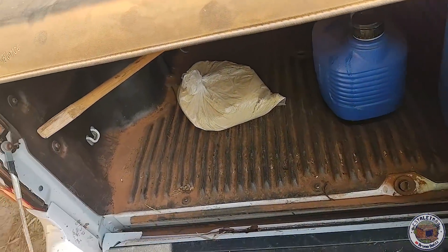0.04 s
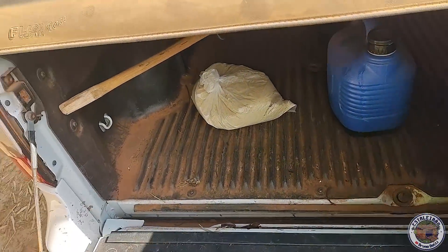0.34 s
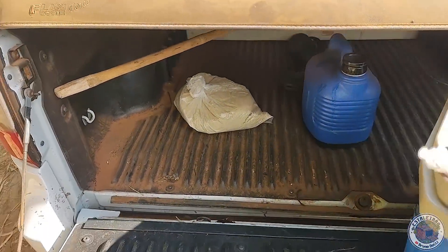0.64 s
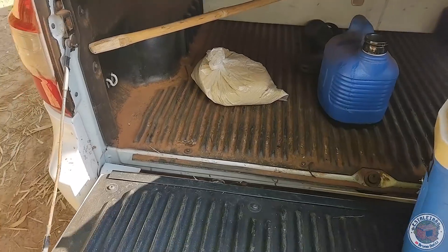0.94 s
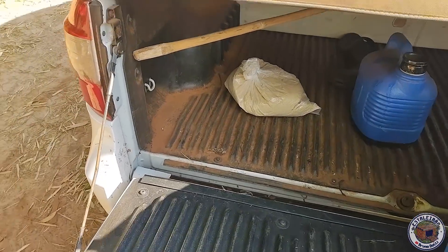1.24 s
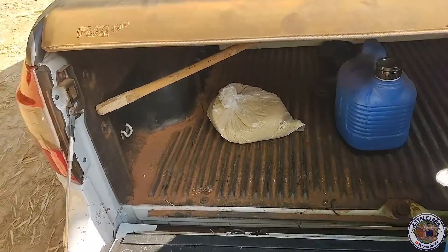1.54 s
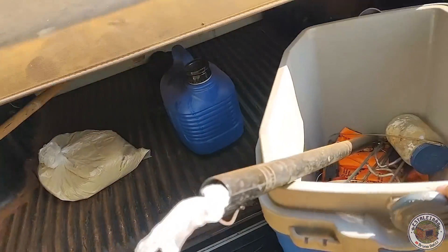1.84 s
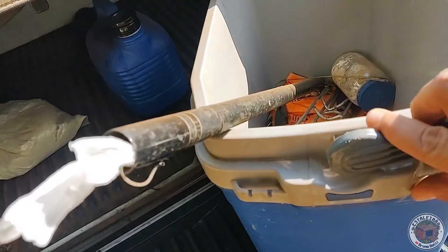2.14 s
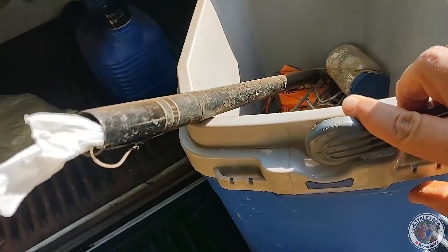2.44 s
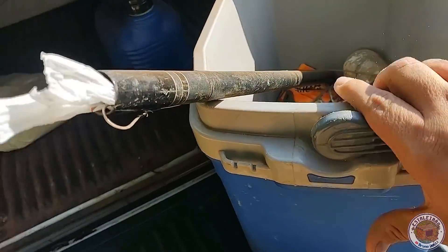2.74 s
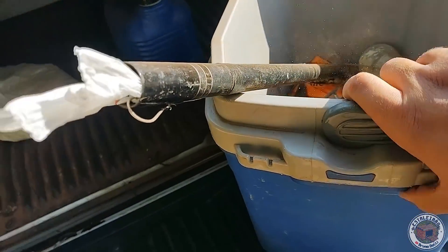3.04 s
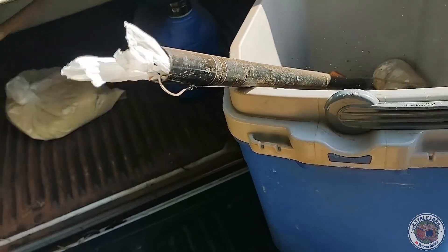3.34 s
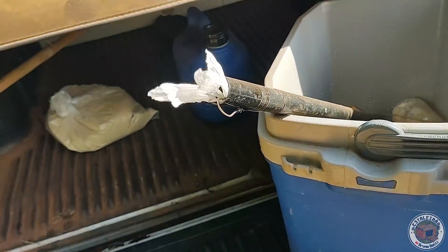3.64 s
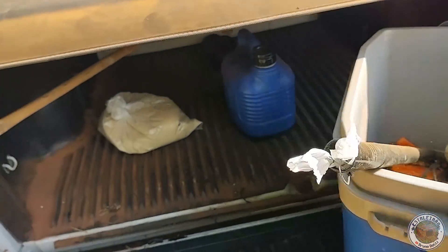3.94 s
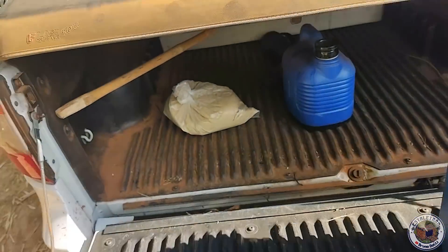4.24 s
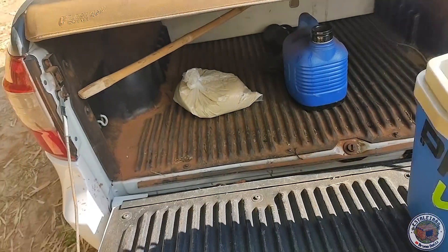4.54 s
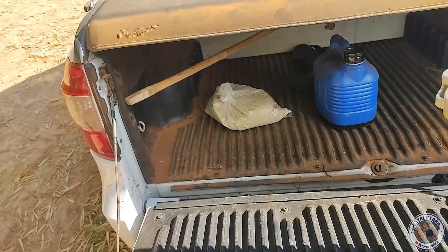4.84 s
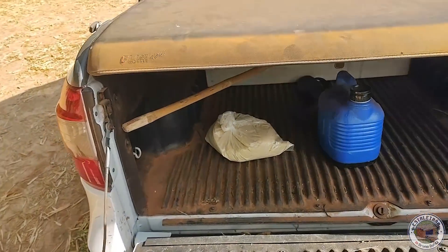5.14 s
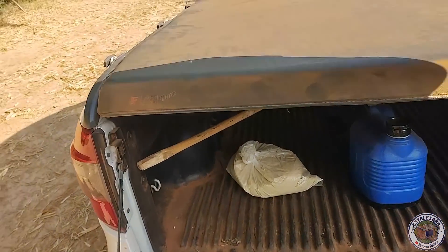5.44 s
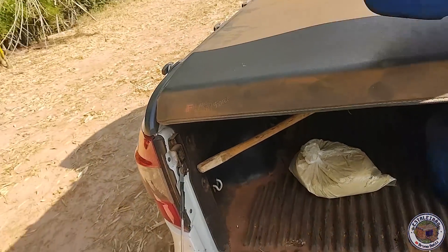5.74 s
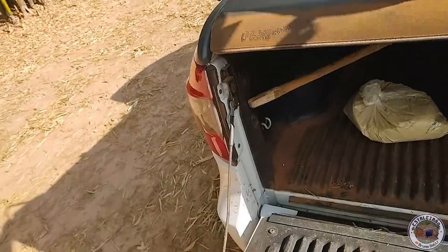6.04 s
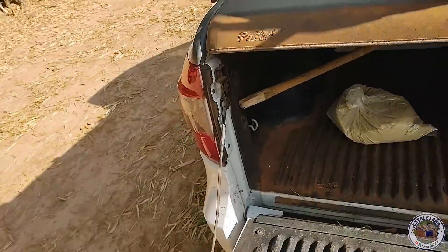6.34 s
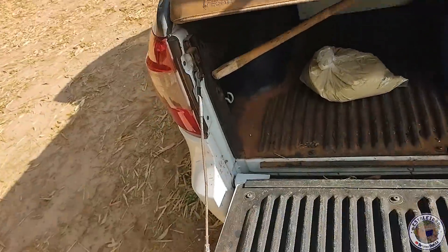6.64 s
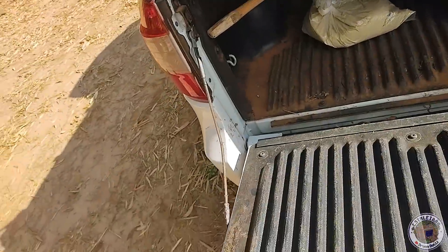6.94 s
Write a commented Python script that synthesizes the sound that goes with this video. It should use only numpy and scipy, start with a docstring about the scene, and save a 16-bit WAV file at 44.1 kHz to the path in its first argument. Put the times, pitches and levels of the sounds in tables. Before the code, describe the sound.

Hollow plastic knocks and gritty, drumming scrapes as a cooler is shoved around a truck bed, over faint outdoor rumble.

```python
"""A loaded plastic cooler is shoved about on the ribbed liner of a pickup bed, outdoors.
Stick-slip makes it drum over the ribs and rasp through its walls, while dust crackles under it.
It rocks and knocks, its handle slaps down, its base bumps dully; each blow rings walls, box and floor.
The bed echoes. A soft background hiss swells with gritty scraping as the cooler slides.
Behind it lie a low outdoor rumble and a thin insect buzz; a second faint rumble joins at the end."""
import sys
import numpy as np
from scipy import signal
from scipy.fft import rfft, irfft, next_fast_len
from scipy.io import wavfile
from scipy.ndimage import map_coordinates

SR = 44100
rng = np.random.default_rng(int(sys.argv[2]) if len(sys.argv) > 2 else 0)


def unload_audio(sound):
    """Save the sound as a 16-bit wav file, at the path given as the first command line argument."""
    columns = np.transpose(np.atleast_2d(sound))
    # keep every value between -1 and 1, then stretch to whole-number steps
    steps = np.round(np.clip(columns, -1, 1) * 32767)
    wavfile.write(sys.argv[1], SR, steps.astype(np.int16))


N = 316638

# Event levels are relative; the functions add per-layer trims.
# hard knocks: t/s, level/dB, boom re level/dB, snap re level/dB, struck spot f/Hz
HARD_KNOCKS = [(0.003, -43, 7, -22, 1060), (0.1115, -32, -6.5, -16.5, 1800), (0.287, -39.5, 7.5, -29, 800),
               (0.39, -32, -6.5, -36, 955), (0.521, -30, -6.5, -29.5, 535), (0.561, -26, 0, -30, 1260),
               (0.5665, -22.5, 3, -38, 1100), (0.657, -22, -9, -40, 1230), (0.705, -35, 7, -14.5, 600),
               (0.958, -19, -1, -17.5, 810), (0.981, -27.5, 2, -23, 920), (1.001, -24.5, -3.5, -24.5, 840),
               (1.0465, -32.5, -12, -33, 1100), (1.161, -32.5, 2, -19.5, 920),
               (1.348, -34.5, -10, -30, 754), (1.496, -34.5, 10.5, -13.5, 840),
               (1.5756, -37.5, -3.5, -15.5, 2020), (1.781, -40.5, 2, -18.5, 1010),
               (1.877, -38.5, 1, -15.5, 1060), (1.923, -41, -3, -34, 700), (2.064, -61, -8, -25, 790),
               (2.8972, -15.6, -8, -15.5, 1450), (3.176, -52.5, -1, -14, 1194), (3.362, -53, -4, -28, 765),
               (3.385, -51, 3, -26, 900), (3.644, -48.5, 0, -26, 1330), (4.05, -29, 2, -26, 955),
               (4.097, -30.5, -1, -25, 810), (4.315, -34.5, 4.5, -36, 537), (4.384, -36.5, 0.5, -26, 1050),
               (4.53, -25, -2, -25, 710), (5.848, -44, -2, 0.5, 796), (6.131, -47, 4, -15.5, 638),
               (6.96, -60.5, 9, 6.5, 948)]
# dull bumps of the base: t/s, level/dB, floor thud re level/dB
BASE_BUMPS = [(0.191, -33, 1), (0.39, -34.5, 8.5), (0.44, -33.5, -18), (0.946, -29, -15),
              (1.603, -32.5, -22), (1.64, -41, 3.5), (2.653, -53, -10), (2.822, -36, -9.5),
              (3.31, -43.5, -16.5), (3.878, -34, -15), (4.367, -25, -8), (4.386, -31, 6), (4.449, -31, -17),
              (4.496, -32, -13), (5.829, -29, -2.5), (5.962, -38, -4), (6.029, -43.5, -5),
              (6.285, -34.5, -25), (6.309, -38.5, -7), (6.835, -57, 11)]
# shoves, then a faint low rumble at the end (6.45-7.18 s):
# start/s, end/s, midpoint drum/dB, rasp/dB, grit/dB, rasp swell/(dB/s)
SHOVES_AND_RUMBLE = [(0, 0.195, -39.5, -47.5, -65, -31), (0.206, 0.55, -33.5, -38, -60, 53),
                     (0.551, 0.724, -31, -34.5, -50, 6), (0.8, 1.34, -54.5, -58, -68, -8),
                     (1.47, 1.95, -52, -66.5, -76.5, -17), (2.702, 2.8, -61.5, -64, -71, 30.5),
                     (2.807, 2.985, -42, -50, -59.5, -0.5), (2.995, 3.176, -59.5, -62, -64.5, -17),
                     (3.33, 3.476, -50, -56, -73, 13), (3.552, 3.75, -56, -63, -71.5, -21.5),
                     (3.887, 4.0, -44.5, -48, -71, 25), (4.012, 4.285, -35, -33, -52.5, -5),
                     (4.345, 4.532, -36.5, -42.5, -60.5, -17), (4.593, 4.676, -47.5, -50.5, -54.5, -25),
                     (4.83, 4.938, -69, -59.5, -68, -24), (5.848, 6.022, -36, -52.5, -59.5, -43),
                     (6.08, 6.42, -53, -72, -73, -12.5), (6.302, 6.352, -41, -58, -77, 0),
                     (6.45, 7.18, -61.5, -75, -70.5, -1.5), (6.947, 7.014, -50.5, -61, -64.5, -46)]
LOOSE_TICKS = [(1.475, -50.5), (1.621, -56.5), (2.257, -68), (4.449, -46), (6.068, -60), (6.305, -56)]  # loose plastic: t/s, level/dB
RIGHT_LEAD = [(.1, .33), (1.55, .34), (1.88, 0.17), (2.9, .07), (4.1, 0.24), (4.53, .32)]  # cooler direction: t/s, lead at right microphone/ms
WALL_MODES = [(363, 130, -6.5), (430, 55, -3), (476, 37, 2.5), (658.2, 21, 2), (735, 83, -2.5),
              (916, 50, -4), (1050, 56, -6), (1210, 100, -5.5), (1454, 92, -7.5), (1660, 66, -6.5),
              (1825, 100, -8), (2206, 90, -13), (2285, 36, -19), (2709, 130, -18.5)]  # cooler walls: f/Hz, bandwidth/Hz, level/dB
BOX_MODES = [(189.4, -7, 0.16), (211.6, -3.5, 0.18), (242, -4.5, 0.12), (295.5, -11.5, 0.15),
             (369.6, -10, 0.065)]  # hollow box: f/Hz, level/dB, t60/s
FLOOR_MODES = [(52, -19.5, 0.16), (79, -8, 0.42), (110, 1.5, 0.17), (131.5, 8, 0.1712)]  # bed floor: f/Hz, level/dB, t60/s
BED_DECAY = [(100, 0.43), (300, 0.28), (1000, 0.29), (4000, 0.46), (12000, .15)]  # bed ring: f/Hz, t60/s
COHERENCE = [(100, 0.55), (300, 0.83), (700, 1), (1500, 0.021), (4000, 0.015)]  # scattered sound: f/Hz, left-right coherence
INSECT_CALLS = [(1.857, 2.157, -73.5), (3.472, 3.97, -69), (4.92, 5.25, -82), (7.009, 7.193, -74)]  # buzzes: start/s, end/s, level/dB
# soft background hiss, swelling with gritty scraping as the cooler slides: t/s, level/dB
HISS_ENVELOPE = [(0.0, -71), (0.4, -74), (0.62, -57), (0.76, -63.5), (2.14, -72.5), (2.32, -74.5),
                 (2.76, -80), (2.96, -65.5), (3.24, -73), (4.0, -73), (4.2, -63), (5.38, -70),
                 (5.88, -63.5), (7.18, -73.5)]
# source spectra: f/Hz, relative density/dB
CRACK_SPECTRUM = [(200, -17.5), (500, 2), (900, 6), (1450, 3), (2100, -1), (2900, -16.5), (3800, -26),
                  (8000, -43.5), (16000, -76)]
CONTENTS_SPECTRUM = [(150, -35.5), (300, -7), (450, 4.5), (800, 3), (1300, -3), (2200, -12), (3000, -22),
                     (4000, -39), (16000, -77)]
SNAP_SPECTRUM = [(1200, -23.5), (2600, -0.5), (4000, 2.5), (5300, 3), (8000, -6), (11000, -18.5),
                 (15500, -27.5)]
DRUM_SPECTRUM = [(25, -41), (50, -17.5), (85, -4), (125, 4), (158, -3.5), (190, -3), (270, -5.5),
                 (440, -12), (800, -32), (3000, -50), (16000, -81)]
RASP_SPECTRUM = [(150, -19), (330, -10.5), (460, 2.5), (850, -5.5), (1300, -1.5), (2000, -5), (2800, -12),
                 (3400, -29), (6000, -39), (16000, -69.5)]
GRIT_SPECTRUM = [(1500, -10), (3300, 0.5), (5500, -0.5), (8000, -7), (11000, -12.5), (15500, -21)]
TICK_SPECTRUM = [(300, -8), (900, 8), (2500, -5.5), (5500, -4), (9000, -13), (15500, -30.5)]
BUZZ_SPECTRUM = [(6000, -33), (8500, -9.5), (10000, -9), (10800, -3.5), (11500, -10), (12500, -21),
                 (15000, -55)]
RUMBLE_SPECTRUM = [(25, -32.5), (65, -8), (130, -2.5), (250, 2), (340, -1), (500, -10), (1000, -18.5),
                   (3000, -26.5), (8000, -62.5)]
HISS_SPECTRUM = [(400, -6.5), (1200, 1.5), (2300, -0.5), (3400, -4.5), (5300, 1.5), (8000, -3.5),
                 (11000, -9), (15500, -11.5)]


def cooler_knocks(contact_rise_s=0.00023, body_rise_s=0.0038, spot_cycles=10, usual_snap_db=-21):
    """Each blow clacks at the contact, chatters through the walls, booms in the box, thuds on the floor."""
    t = np.arange(SR // 2) / SR
    fall = lambda t60_s: amp(-60 * t / t60_s)
    rise = lambda tau_s: 1 - np.exp(-t / tau_s)
    touch = burst(1. * (t == 0))
    hardest_db = max(row[1] for row in HARD_KNOCKS)
    track = np.zeros(N)
    for t_s, clack_db, chatter_db, boom_db, thud_db, snap_db, spot_hz in blows():
        noise = rng.standard_normal((5, len(t)))
        # gentler, blunter blows stay in contact longer: slower attack
        edge_db = snap_db - clack_db - usual_snap_db
        press = rise(contact_rise_s * amp(0.2 * (hardest_db - clack_db) - 0.4 * edge_db)) ** 2
        grind = burst(noise[0] * fall(0.012) * press)
        crack = coloured(touch + 1.1 * grind, CRACK_SPECTRUM)
        spot = np.sin(2 * np.pi * spot_hz * t) * fall(spot_cycles / spot_hz) * press
        clack = amp(-2.7) * burst(crack) + amp(-5) * burst(spot)
        # loose contents drive the walls and the struck spot
        contents = coloured(noise[1] * fall(0.13) * rise(0.0079), CONTENTS_SPECTRUM)
        ring = walls(noise[2] * fall(0.081))
        rattle = signal.fftconvolve(noise[3] * fall(0.07), spot)[:len(t)]
        chatter = amp(-3) * burst(contents) + amp(-3) * burst(ring) + amp(-9) * burst(rattle)
        boom = burst(ringing(BOX_MODES, t, detune=0.023) * rise(body_rise_s) ** 2)
        thud = burst(ringing(FLOOR_MODES, t, detune=0.071) * rise(body_rise_s))
        # grit snaps, then is crushed
        crush = burst(noise[4] * (fall(0.0047) + amp(-18) * fall(0.1)) * press)
        snap = burst(coloured(amp(-2) * touch + crush, SNAP_SPECTRUM))
        add(track, t_s, amp(clack_db) * clack + amp(chatter_db) * chatter + amp(snap_db - 1) * snap)
        add(track, t_s, amp(boom_db - 1) * boom + amp(thud_db - 2) * thud)
    return track


def blows(base_hz=700):
    """Knocks and blunter bumps: t/s, clack/dB, chatter/dB, boom/dB, thud/dB, snap/dB, f/Hz."""
    hard = [(t_s, db, db + boom_db / 2 - 5, db + boom_db, db + boom_db - 11.5, db + snap_db, hz)
            for t_s, db, boom_db, snap_db, hz in HARD_KNOCKS]
    dull = [(t_s, db - 14, db - 10.5, db, db + thud_db, db - 32, base_hz * 2 ** rng.normal(0, 0.37))
            for t_s, db, thud_db in BASE_BUMPS]
    return hard + dull


def ringing(modes, t, detune):
    """Damped modes; level and pitch vary from blow to blow."""
    scatter = rng.standard_normal((len(modes), 2))
    return sum(amp(db + 1.9 * a - 60 * t / t60_s) * np.sin(2 * np.pi * hz * (1 + detune * b) * t)
               for (hz, db, t60_s), (a, b) in zip(modes, scatter))


def walls(x):
    """Wall resonances in parallel, alternating in sign."""
    return filtered(x, lambda f: sum(
        (-1) ** k * amp(db) * 1j * f * width_hz / (hz * hz - f * f + 1j * f * width_hz)
        for k, (hz, width_hz, db) in enumerate(WALL_MODES)))


def slides_and_rumble():
    """The base drums over the ribs and rasps through the walls; dust crackles. A faint rumble ends it."""
    drum_gain, rasp_gain, grit_gain = drum_rasp_grit_gains()
    judder = wobble(45)
    drum = unit(coloured(slips(rate_hz=410, scatter_db=5.5), DRUM_SPECTRUM))
    rub = unit(coloured(slips(rate_hz=2600, scatter_db=7) * amp(2 * judder), RASP_SPECTRUM))
    ring = unit(walls(slips(rate_hz=1200, scatter_db=10)))
    rasp = unit(rub + amp(-1) * ring)
    grains = [slips(rate_hz=4300, scatter_db=4) * amp(2.5 * judder) for channel in "LR"]
    grit = unit(np.array([coloured(side, GRIT_SPECTRUM) for side in grains]))
    return amp(-2) * (drum_gain * drum + rasp_gain * rasp), amp(-1) * grit_gain * grit


def slips(rate_hz, scatter_db):
    """Stick-slip jolts, random in time and size."""
    size = amp(scatter_db * np.clip(rng.standard_normal(N), -2, 2))
    sign = np.sign(rng.standard_normal(N))
    return unit(size * sign * (rng.random(N) < rate_hz / SR))


def drum_rasp_grit_gains(attack_db_per_s=600.5, stop_db_per_s=221.5, grit_db_per_s=251.5):
    """Each span sets in, swells or eases, dies away; overlaps add in power."""
    power = np.zeros((3, N))
    for start_s, end_s, drum_db, rasp_db, grit_db, swell_db_per_s in SHOVES_AND_RUMBLE:
        near = np.arange(max(int((start_s - .5) * SR), 0), min(int((end_s + .5) * SR), N))
        t = near / SR
        before_s, after_s = np.maximum(start_s - t, 0), np.maximum(t - end_s, 0)
        swell_db = swell_db_per_s * (np.clip(t, start_s, end_s) - (start_s + end_s) / 2)
        fade_db = attack_db_per_s * before_s + stop_db_per_s * after_s
        power[:, near] += amp([drum_db + 0.35 * swell_db - fade_db,
                               rasp_db + swell_db - fade_db,
                               grit_db + 0.93 * swell_db - grit_db_per_s * (before_s + after_s)]) ** 2
    return np.sqrt(power)


def ticks(t60_s=0.0099):
    """Small loose parts touch without moving the box."""
    t = np.arange(SR // 8) / SR
    track = np.zeros(N)
    for t_s, db in LOOSE_TICKS:
        contact = rng.standard_normal(len(t)) * amp(-60 * t / t60_s)
        add(track, t_s, amp(db) * burst(coloured(contact, TICK_SPECTRUM)))
    return track


def direct_path(x, pan_db=0.78):
    """Sound reaches the right microphone earlier and louder."""
    lead_ms = curve(RIGHT_LEAD)
    shift_samples = lead_ms / 2 * SR / 1000
    left = map_coordinates(x, [np.arange(N) - shift_samples])
    right = map_coordinates(x, [np.arange(N) + shift_samples])
    return np.array([amp(-pan_db) * left, amp(pan_db) * right])


def truck_bed(x, block_samples=6144):
    """Cooler and microphone keep moving: each block meets a new echo pattern."""
    wet = np.zeros((2, N))
    for start in range(0, N, block_samples):
        echoes = signal.fftconvolve(x[None, start:start + block_samples], bed_echo(), axes=1)
        for track, echo in zip(wet, echoes):
            add(track, start / SR, echo)
    return wet


def bed_echo(early_t60_s=0.043):
    """Close echoes off liner and cover, then a weak ring of the bed."""
    hz, frame_s, spectra = signal.stft(rng.standard_normal((2, SR // 3)), SR, nperseg=256)
    decay = amp(-60 * frame_s / along(BED_DECAY, hz)[:, None])
    tail = signal.istft(spectra * decay, SR, nperseg=256)[1]
    t = np.arange(tail.shape[1]) / SR
    early = rng.standard_normal(tail.shape) * amp(-60 * t / early_t60_s) * (t > .0015)
    # long waves bend round the ribs; short ones scatter
    scattering = lambda f: amp(along([(200, -13), (1000, 2), (6000, 3.5)], f))
    early = filtered(early / np.linalg.norm(early[0]), scattering)
    return spread(amp(-6) * early + amp(-21) * tail / np.linalg.norm(tail[0]))


def outdoor_rumble(lull_s=5.555, lull_db=-12.6):
    """A wavering low rumble with one lull."""
    level_db = -61.5 + lull_db * gate(lull_s, lull_s, fade_s=0.505) + 2.8 * wobble(6.8)
    return amp(level_db) * wash(RUMBLE_SPECTRUM)


def hiss_and_scraping():
    """Soft background hiss, swelling with gritty scraping as the cooler slides."""
    level_db = curve(HISS_ENVELOPE) + 2 + 0.7 * wobble(6.5)
    return amp(level_db) * wash(HISS_SPECTRUM)


def insect():
    """A thin, high, fluttering buzz from the dry grass."""
    gain = sum(amp(db) * gate(start_s, end_s, fade_s=0.11) for start_s, end_s, db in INSECT_CALLS)
    return gain * amp(0.83 * wobble(60)) * wash(BUZZ_SPECTRUM)


def wash(spectrum):
    """Diffuse stereo noise, rms 1."""
    noise = filtered(rng.standard_normal((2, N)), lambda hz: amp(along(spectrum, hz)))
    return unit(spread(noise))


def spread(pair):
    """Two unrelated signals to stereo: alike in the bass, unrelated in the treble."""
    angle = lambda hz: np.arccos(np.clip(along(COHERENCE, hz), -1, 1)) / 2
    mid, side = filtered(pair, lambda hz: np.array([np.cos(angle(hz)), np.sin(angle(hz))]))
    return np.array([mid + side, mid - side])


def coloured(x, spectrum, taps=4096):
    """Minimum-phase filter: nothing sounds before a blow."""
    cepstrum = irfft(np.log(amp(along(spectrum, np.fft.rfftfreq(taps, 1 / SR)))))
    cepstrum[1:taps // 2] *= 2
    cepstrum[taps // 2 + 1:] = 0
    impulse_response = irfft(np.exp(rfft(cepstrum)))
    return signal.fftconvolve(x, impulse_response)[:len(x)]


def filtered(x, response):
    """Apply a frequency response."""
    n = x.shape[-1]
    padded = next_fast_len(n + SR // 8)
    return irfft(rfft(x, padded) * response(np.fft.rfftfreq(padded, 1 / SR)), padded)[..., :n]


def amp(db):
    """dB to gain."""
    return 10 ** (np.asarray(db) / 20)


def unit(x):
    """Scale to rms 1."""
    return x / np.sqrt(np.mean(x ** 2) + 1e-20)


def burst(x):
    """Scale to the energy of 20 ms at rms 1."""
    return x / np.sqrt(np.sum(x ** 2) / (SR / 50) + 1e-20)


def along(points, hz):
    """Interpolate (f/Hz, value) on a log axis."""
    knots_hz, values = np.transpose(points)
    return np.interp(np.log(hz + 1), np.log(knots_hz), values)


def curve(points):
    """Interpolate (t/s, value) per sample."""
    return np.interp(np.arange(N) / SR, *np.transpose(points))


def gate(start_s, end_s, fade_s):
    """1 from start to end, linear fades outside."""
    t = np.arange(N) / SR
    return np.clip(np.minimum(t - start_s, end_s - t) / fade_s + 1, 0, 1)


def wobble(rate_hz):
    """Spline through random knots."""
    knots = rng.standard_normal(int(N * rate_hz / SR) + 4)
    return map_coordinates(knots, [np.arange(N) * rate_hz / SR])


def add(track, t_s, sound):
    """Mix a sound in at t_s."""
    start = max(round(t_s * SR), 0)
    track[start:start + len(sound)] += sound[:N - start]


def scene():
    """The cooler in the truck bed, in the open air."""
    drum_and_rasp, dust = slides_and_rumble()
    near = cooler_knocks() + ticks() + drum_and_rasp
    return direct_path(near) + truck_bed(near) + dust + outdoor_rumble() + hiss_and_scraping() + insect()


def record(dry, low_cut_hz=42, top_hz=15850):
    """Low cut, hard limit at full scale, band limit."""
    thinned = signal.sosfilt(signal.butter(2, low_cut_hz, "highpass", fs=SR, output="sos"), dry)
    return filtered(np.clip(thinned, -1, 1), lambda hz: hz < top_hz)


dry = scene()
out = record(dry)
unload_audio(out)
```